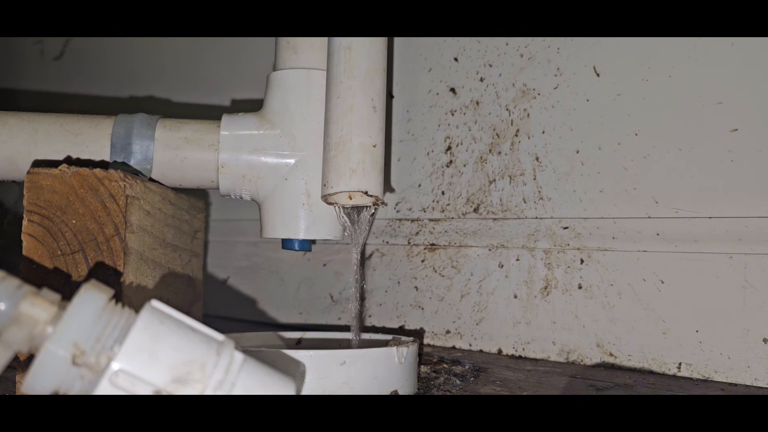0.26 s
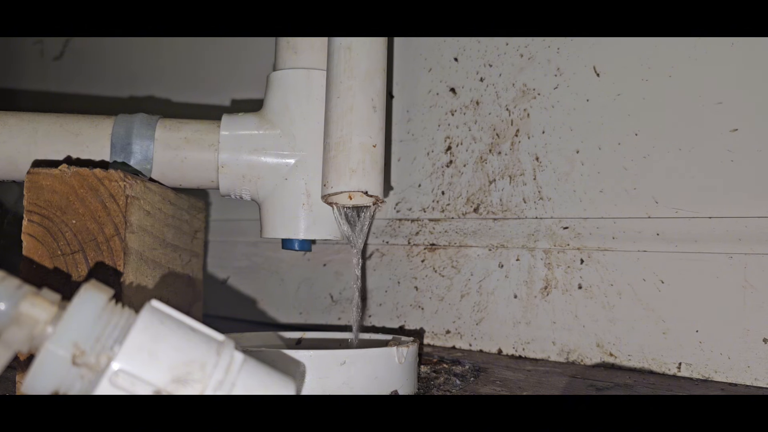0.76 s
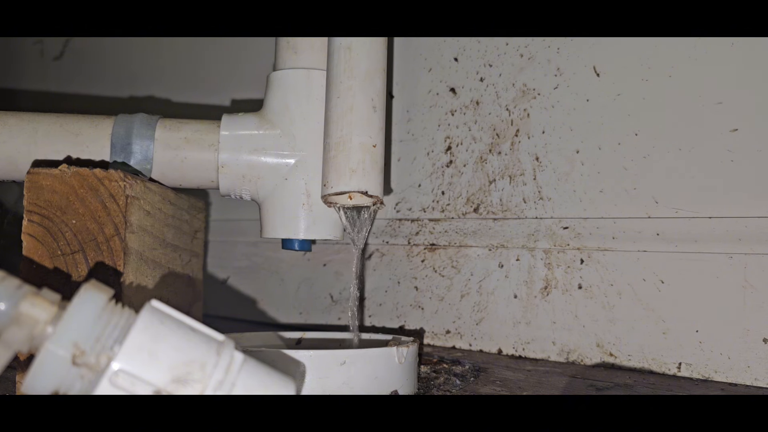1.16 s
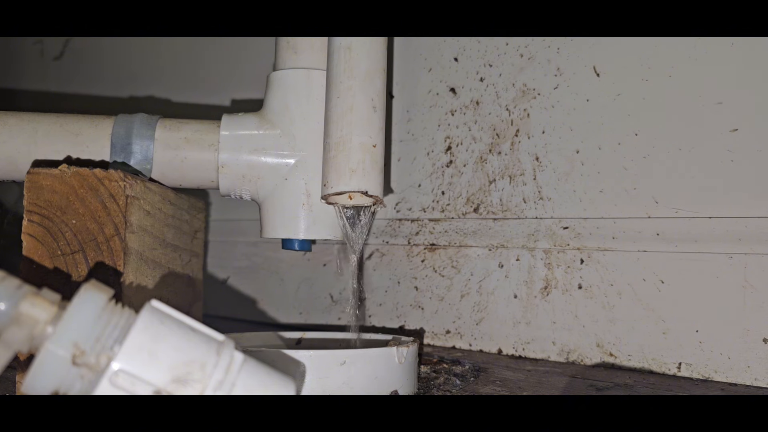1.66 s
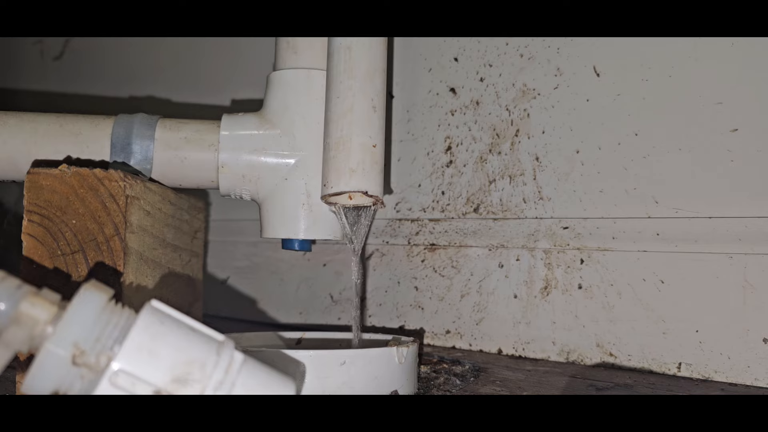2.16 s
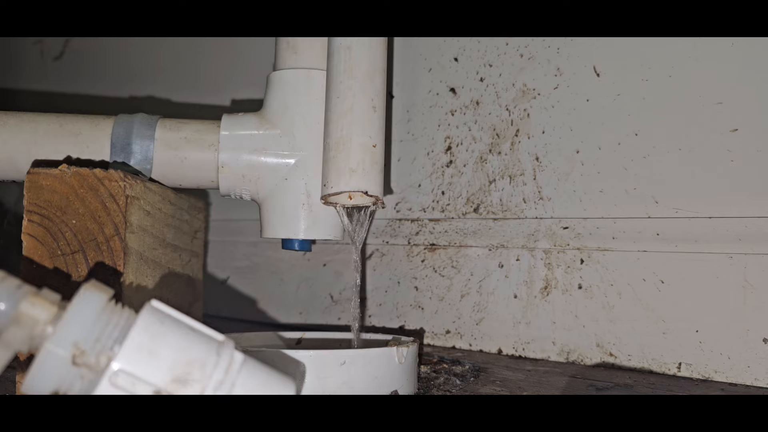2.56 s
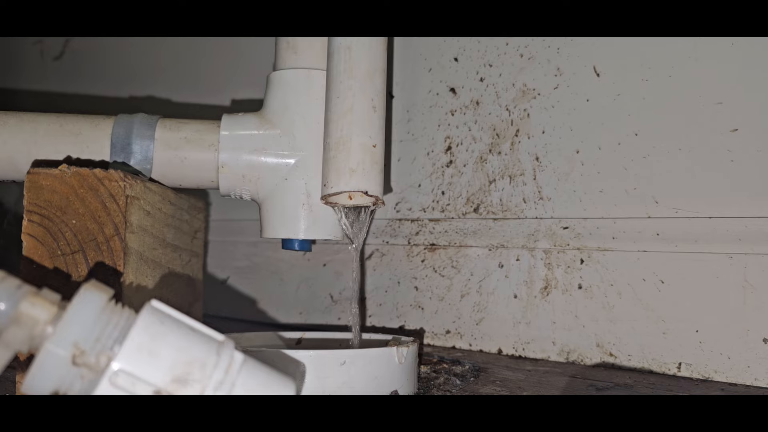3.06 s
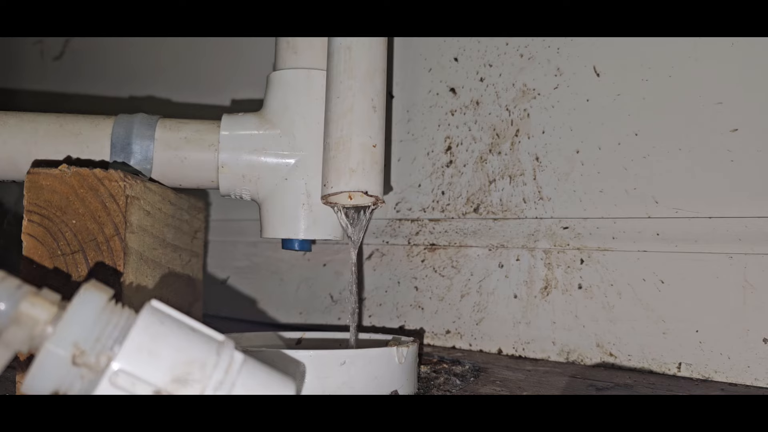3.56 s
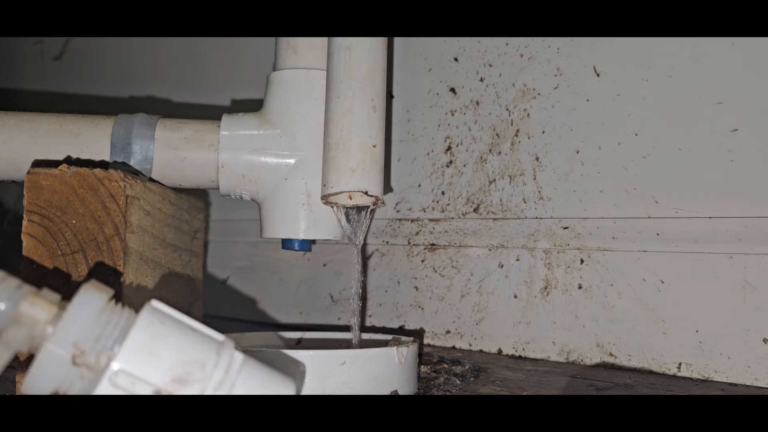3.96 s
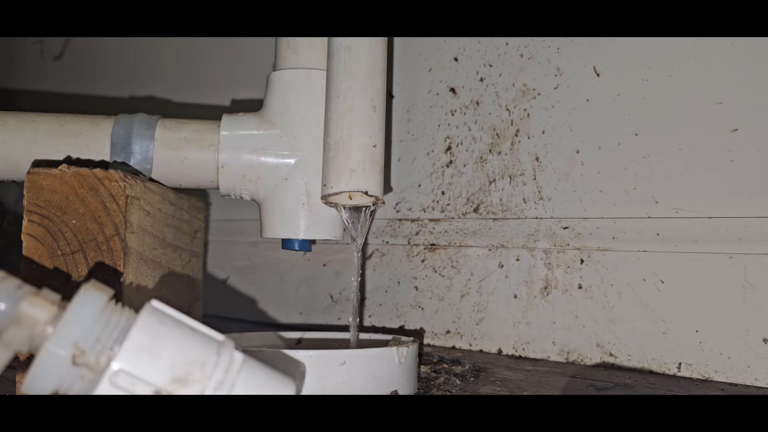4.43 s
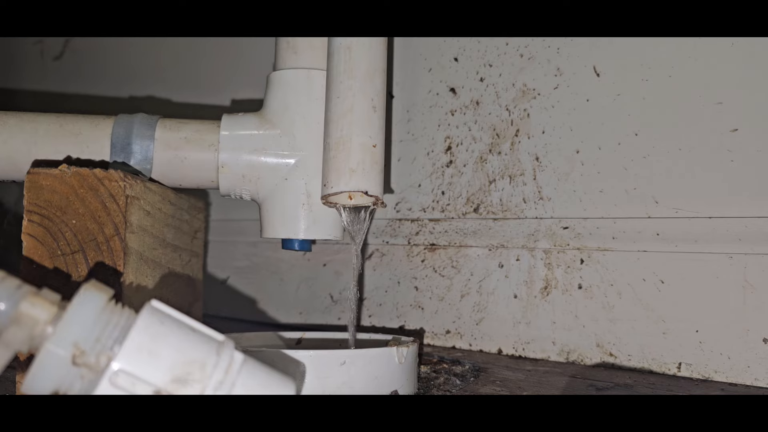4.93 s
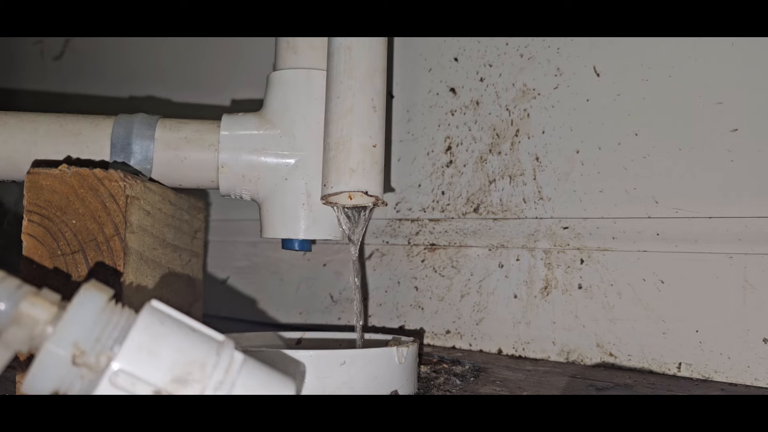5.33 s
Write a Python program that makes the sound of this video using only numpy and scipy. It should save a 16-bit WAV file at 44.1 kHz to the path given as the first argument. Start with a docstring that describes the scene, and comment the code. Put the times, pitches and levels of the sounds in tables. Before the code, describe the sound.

A thin stream patters and gurgles softly into an open standpipe while motors hum very low. Soft brushing comes first, then a sudden deep bump and rattling knocks as someone shifts about close to the phone, mostly left of centre. Smaller cracks and rustles continue, thinning toward the end while the water keeps running. The room adds only short reflections.

```python
"""A machine hums and water trickles from a plastic pipe into a standpipe in a small utility room.
Coloured droplet noise makes the trickle, ringing clicks the single drops, and steady tones the hum.
Then, to the left of a two-port phone microphone, someone shifts about: uneven noise grains make cloth
and shoes rustle, struck resonances make things knock, and slower decaying sines make them thud.
Spray ticks and air hiss are filtered noise; knocks and drops also excite short room reflections."""
import sys
import numpy as np
from scipy import signal
from scipy.fft import rfft, irfft, next_fast_len
from scipy.io import wavfile
from scipy.ndimage import uniform_filter1d

SR = 44100
rng = np.random.default_rng(int(sys.argv[2]) if len(sys.argv) > 2 else 0)


def dump_mix(stems):
    """Bounce the given channels to the path in sys.argv[1] as a 16-bit WAV at rate SR."""
    frames = np.atleast_2d(stems).T  # one column per channel
    limited = np.clip(frames, -1, 1)  # hard clip at full scale
    pcm = np.round(limited * 32767).astype(np.int16)
    wavfile.write(sys.argv[1], SR, pcm)


N = 246519  # length in samples

# Colour of the standpipe: (frequency [Hz], relative level [dB per Hz])
DRAIN_COLOUR = [(44, -36), (75, 1), (87, -13), (124, -5), (182, -24), (199, -8), (252, -4), (299, -14.5),
                (358, -13.5), (458, -15), (501, -10), (627, -24.5), (1100, -33), (1430, -62.5),
                (2420, -120)]
# Resonances of the faintly ticking standpipe rim: (frequency [Hz], width [Hz], level [dB])
RIM_MODES = [(815, 380, -6), (1160, 370, -2.5), (1337, 424, 0.5), (2193, 120, -21.5), (2900, 220, -18),
             (3700, 330, -28), (4240, 300, -20)]
# Single drops that stand out: (time [s], dull peak [dB], bright part relative to dull [dB])
DROPS = [(0.182, -46, -11), (0.251, -43, 6), (0.28, -43, -25), (0.434, -48, -6), (0.544, -46, -24),
         (0.571, -48, -10), (1.439, -44, -8), (1.536, -43, -14), (1.745, -41.5, -21), (1.808, -43, -10),
         (1.867, -46, -19), (2.903, -46, -14), (3.035, -47, -19)]
# Dull ring of a drop: (frequency [Hz], width [Hz], level [dB])
PLOP_MODES = [(257, 110, 0), (521, 177.5, 0)]
# Bright ring of a drop: (frequency [Hz], width [Hz], level [dB])
PLINK_MODES = [(1406, 167, 9), (2300, 416, 3), (3500, 1070, -8)]
# Knocks: (time [s], hollow peak [dB], crack relative [dB], fizz relative [dB],
#          hollow spot [Hz], crack spot [Hz], left minus right [dB])
KNOCKS = [(1.157, -41, -9, -11, 477, 1240, 2.5), (2.124, -29.5, -3, -9, 484, 2210, 6),
          (2.446, -22.5, -10, -18, 421, 1600, 4), (2.622, -30, -21, -24, 395, 1390, 8.5),
          (2.636, -31, -15, -23.5, 407, 1250, 15), (2.709, -44, -2, -25.5, 466, 1320, 8),
          (3.088, -22, 0, -4, 673, 1560, 7.5), (3.101, -23.5, -2, -18, 492, 1330, 2.5),
          (3.115, -25.5, -11.5, -18, 400, 1540, 1), (3.178, -30.5, -8, -38.5, 538, 1720, 4),
          (3.258, -27, -14, -20.5, 650, 1570, 0), (3.289, -33.5, -16.5, -7, 392, 1750, 11),
          (3.36, -42.5, -8.5, -6, 870, 3509, 3.5), (3.503, -34, 3.5, -12.5, 890, 1430, 4),
          (3.689, -39.5, -2.5, -12, 937, 2110, 2.5), (3.733, -29, -5, -5, 895, 1490, 2),
          (3.903, -44.5, -6.5, -23.5, 443, 1200, 2), (4.02, -30, 2.5, -6.5, 870, 1334, 4.5),
          (4.036, -33, 5, -5.5, 870, 1840, 3.5), (4.172, -38.5, 2, -14.5, 760, 1960, 2.5),
          (4.193, -35.5, 12, -9.5, 724, 2020, 1), (4.221, -38, -7, -18, 826, 1310, 6),
          (4.313, -40.5, -6, -9, 430, 1510, 6.5), (4.413, -25, 5.5, -0.5, 530, 1710, 5),
          (4.429, -46.5, 1.5, 2.5, 484, 1460, 5.5), (4.556, -36.5, -1.5, -4, 818, 1250, 0.5),
          (4.783, -37, 0.5, -7, 785, 4200, 5.5), (4.798, -34.5, -5, -8.5, 830, 1210, 4),
          (4.878, -33.5, -4.5, -12.5, 500, 1390, 3), (4.953, -48, 9, -30.5, 425, 2090, -1.5),
          (5.144, -52, 19, -27.5, 390, 2050, 1)]
# Hollow body of the knocked things: (frequency [Hz], width [Hz], level [dB])
HOLLOW_MODES = [(346, 46.5, -4), (428.7, 35.3, 4), (461.5, 60, 0), (579.3, 38.6, 1), (635, 30, -2.5),
                (708.6, 60.3, 2.5), (774.4, 29.7, 2.5), (850.6, 76.1, 2), (949, 12.5, -1.5),
                (1117, 140, -12.5)]
# Higher, cracking resonances of the knocked things: (frequency [Hz], width [Hz], level [dB])
CRACK_MODES = [(1417, 269, -0.12), (1589, 28.3, 3.5), (1712, 173, -5), (2196, 163, 1.45), (2585, 125, -3.5),
               (2913, 124, 3.35), (3215, 144, 3), (3485, 121, 2.5), (3776, 276, -4), (4192, 147, -5),
               (4342, 865, -5), (5326, 110, -2)]
# Thuds: (time [s], panel level [dB], floor relative [dB], struck pitch region [Hz],
#         contact time [ms], damping factor [times])
THUDS = [(1.159, -45, -3, 235, 2.3, 1.77), (2.446, -14.5, -4, 133.9, 2.72, 1.66),
         (2.457, -11, -30, 172.4, 4.02, 1.665), (2.62, -28, -8, 182.2, 1.87, 1.77),
         (2.639, -32, -11, 166.9, 1.48, 2.3), (2.699, -42, 6.5, 169, 4.97, 1.67),
         (3.093, -25.5, -3.5, 136.1, 1.24, 0.69), (3.109, -25.5, -5.5, 141, 1.64, 1.31),
         (3.172, -42, 11, 131.5, 4.4, 1.53), (3.21, -46.5, 13.5, 129, 5.3, 1.5),
         (3.265, -39, 9, 299, 5.9, 1.67), (3.301, -40, -2.5, 218, 3.4, 1.74),
         (3.716, -47, 10, 238, 7.5, 1.33), (4.023, -44.5, 6, 214, 2.9, 1.2),
         (4.314, -42.5, 4, 133, 4.9, 0.96), (4.413, -27, -4.5, 232, 2.23, 1.77),
         (4.429, -37.5, 3, 238, 2.75, 1.5), (4.862, -42, -5, 244, 3.3, 0.69),
         (5.28, -34.5, -28.5, 215, 5.76, 1.56)]
# Panels: (frequency [Hz], decay to -60 dB at damping factor 1 [s], level [dB])
PANEL_MODES = [(158.7, 0.3627, 3.5), (187.63, 0.3451, -2), (209.44, 0.46, -1.5), (227.3, 0.0051, 8.5),
               (240.8, 0.0135, -2.5), (290.2, 0.14, 0)]
# The deeper floor: (frequency [Hz], decay to -60 dB at damping factor 1 [s], level [dB])
FLOOR_MODES = [(80.08, 0.596, -4), (91.37, 0.305, 6.5), (111.36, 0.312, -3.5)]
# Rustles: (time at full strength [s], rise over 20 dB [s], hold [s], fall over 20 dB [s],
#           hiss [dB], scrape relative [dB], drag relative [dB]); very short slopes are lengthened
RUSTLES = [(1.26, 0.15, 0.081, 0.4, -70.5, 1.5, 1), (1.57, 0.1286, 0.0125, .06, -46, -5, -17),
           (1.687, 0.16, 0.042, 0.66, -71.5, 2.5, 3.5), (1.978, .016, 0.047, 0.0411, -46.5, -4.5, -15.5),
           (2.1, 0.0557, .015, .08, -59, 4.5, 1.5), (2.318, 0.3447, 0.048, 0.02, -70.5, 2.5, 6.5),
           (2.432, .015, 0.072, .07, -55, 0.5, 5), (2.697, 0.2062, 0.0883, 0.1962, -60.5, 1, 6.5),
           (2.97, -0.16, 0.113, -0.1, -55.5, -6.5, -12.5), (3.288, 0.1428, 0.004, 0.2144, -52.5, 0, 11.5),
           (3.359, 0.018, 0.0065, 0.1764, -57, -2, 4.5), (3.446, -0.13, 0.0453, 0.1955, -54, -5, -7.5),
           (3.718, 0.0644, 0.0424, 0.06, -45, -1, -0.5), (3.844, 0.77, 0.166, 0.99, -64.5, 2, 3),
           (4.182, 0.03, 0.0334, -0.0269, -57, 3.5, 5.5), (4.274, .025, .012, .085, -53, -5, -9),
           (4.582, 0.1918, 0.008, 0.1092, -47, 0.5, -2.5), (4.663, 0.3043, 0.0071, 0.11, -52, 1, 6),
           (4.819, 0.2043, 0.0083, 0.085, -57, 3.5, 4), (4.875, 0.0027, 0.0039, 0.1046, -55, 3, 6),
           (5.021, .02, 0.019, 0.21, -69, -7, 3), (5.113, -1.67, 0.0087, 1.27, -76.5, -10.5, 4.5),
           (5.356, .1, .015, .07, -57, -4, 3)]
# Colour of the cloth hiss: (frequency [Hz], relative level [dB per Hz])
CLOTH_COLOUR = [(2650, -32.5), (4500, -10), (6740, -4), (7650, 0), (10300, -15.5), (11500, 1),
                (14200, -4.5), (16000, -3)]
# Fine spray ticks: (time [s], level [dB], pitch [Hz])
SPRAY_TICKS = [(0.332, -48, 11270), (0.4559, -49, 11300), (0.617, -54.5, 10800), (0.7003, -60, 12000),
               (0.808, -47, 13300), (0.845, -51.5, 15300), (0.884, -53, 13760), (1.768, -47.5, 11550)]
# Colour of the room air: (frequency [Hz], relative level [dB per Hz])
AIR_COLOUR = [(2000, -6), (2250, -3.5), (2600, -9.5), (4200, -8.5), (5500, -16), (7300, -9), (9500, -32.5),
              (11400, -14.5), (12500, -21.5), (15500, -15)]
# Two motors that beat against each other, and the mains: (frequency [Hz], RMS level [dB])
HUM_TONES = [(53.6, -45), (58.9, -57), (120.05, -62)]

FLOW_DB = -55  # middle level of the trickle before the pipe colours it
AIR_DB, RUMBLE_DB = -74, -58
SCUFF_DB = -3.5  # deep scuffing, relative to the drag
RATTLE_MS, RISE_MS = 18.25, 0.8955  # rattle decay to -20 dB, time constant of its onset
SNAP_DB = 7.5  # broad snap, relative to the fizz
ROOM_T60_S, ROOM_DB = 0.118, -10.934  # decay to -60 dB, energy of the reflections
LEAD_S, DRAIN_LEAD_S, LOW_LEAD_S = 0.00048, 0.00019, 0.000205  # head start of the left port
TOP_HZ = 15900


def drain(per_s=900, spread_db=4.5, gush=0.547):
    """Droplets of very unequal size patter over a smooth gush and ring the pipe; some drops stand out."""
    falls = rng.random(N) < per_s / SR
    size = undb(spread_db * np.minimum(rng.exponential(size=N), 4))
    patter = unit(falls * size * rng.choice([-1., 1.], N))
    flow = (patter + gush * pair(0.533)) * undb(FLOW_DB + 2.28 * walk(12))
    pipe = colour(flow, DRAIN_COLOUR, DRAIN_LEAD_S) * undb(1.0)
    rim = 0
    for hz, width, db in RIM_MODES:
        once = ring(flow, [(hz, width, 0)])
        rim = rim + ring(once, [(hz, width, db)])  # ringing twice narrows each resonance
    pipe += late(rim, DRAIN_LEAD_S)

    dull, bright = np.zeros(N), np.zeros(N)
    for s, db, bright_db in DROPS:
        dull[int(s * SR)] = undb(db)
        bright[int(s * SR)] = undb(db + bright_db)
    click = 1. * (np.arange(SR // 10) == 0)
    drops = np.zeros(N)
    for hits, modes in ((dull, PLOP_MODES), (bright, PLINK_MODES)):
        drops += signal.fftconvolve(hits, peak(ring(click, modes)))[:N]
    return pipe, late(np.array([drops, drops]), DRAIN_LEAD_S)


def knocks(bounces_per_s=4000, hollow_reach=0.268, crack_reach=0.497, settle_db=-16, lean_db=1.2):
    """A sharp blow and a dying rattle of bounces ring the hollow body, crack and fizz (reach in octaves)."""
    hollow_out, sharp_out = np.zeros((2, 2, N + SR))
    ms = np.arange(SR // 4) / SR * 1000
    fade_db, swell = -20 * ms / RATTLE_MS, 1 - np.exp(-ms / RISE_MS)
    # A slower settling follows the rattle
    envelope = swell * (undb(fade_db) + undb(settle_db + fade_db / 4.65))
    for s, db, crack_db, fizz_db, hollow_hz, crack_hz, pan_db in KNOCKS:
        chance = rng.standard_normal(size=(5, len(ms)))
        hits = rng.random(len(ms)) < bounces_per_s / SR
        bounce = hits * (chance[0] + 0.77 * chance[1:3])  # partly unlike at the two ports
        force = bounce * envelope
        force[:, int(RISE_MS * SR / 1000)] += 3.5  # the blow itself
        hollow = peak(ring(force, near(HOLLOW_MODES, hollow_hz, hollow_reach)))
        crack = ring(force, near(CRACK_MODES, crack_hz, crack_reach))
        crack = peak(band(crack, 0.55 * crack_hz, 2.8 * crack_hz))
        fizz = peak(band(chance[3:] * swell * undb(fade_db / 2.464), 2300, 11500, order=1))
        fizz += undb(SNAP_DB) * peak(band(force, 1060, 4780))
        sharp = undb(crack_db) * crack + undb(fizz_db) * fizz
        gain = undb(db + np.array([[pan_db], [-pan_db]]) / 2)
        at = slice(int(s * SR), int(s * SR) + len(ms))
        hollow_out[:, at] += gain * hollow
        sharp_out[:, at] += gain * undb([[-lean_db], [lean_db]]) * sharp  # leans right of the hollow ring
    return late(hollow_out[:, :N], LOW_LEAD_S) + late(sharp_out[:, :N], LEAD_S)


def thuds(reach=0.0868):
    """A soft push rings the floor and the panels whose pitch lies near the struck spot (reach in octaves)."""
    out, t = np.zeros(N + SR), np.arange(SR // 2) / SR
    for s, db, floor_db, spot_hz, contact_ms, damp in THUDS:
        floor = [(hz, t60, g + floor_db - 3.5) for hz, t60, g in FLOOR_MODES]
        note = np.zeros(len(t))
        for hz, t60, g in near(PANEL_MODES, spot_hz, reach) + floor:
            note += undb(g - 60 * damp * t / t60) * np.sin(2 * np.pi * hz * t)
        onset = 1 - np.exp(-t * 1000 / max(contact_ms, .5))
        start = int(s * SR)
        out[start:start + len(t)] += undb(db) * note * onset
    return late(out[:N] * undb([[1.2], [-1.2]]), LOW_LEAD_S)


def rustle():
    """Fibres slip in a dense uneven stream: moves swell, hold and fade as hiss, scrape and dull drag."""
    t, powers = np.arange(N) / SR, 0
    for s, rise_s, hold_s, fall_s, db, scrape_db, drag_db in RUSTLES:
        before = np.maximum((s - t) / max(rise_s, .015), 0)
        after = np.maximum((t - s - hold_s) / max(fall_s, .04), 0)
        level = undb(db - 20 * (before + after))
        powers = powers + (level * undb([[0], [scrape_db], [drag_db]])) ** 2
    grain = undb(1.82 * walk(60) + 1.006 * walk(300))
    hiss = unit(colour(pair(0.049), CLOTH_COLOUR))
    scrape = flutter(pair(0.176), CRACK_MODES, 3.22, 40)
    scrape = unit(scrape + 0.25 * band(pair(0.118), 1300, 5500))
    drag = unit(flutter(pair(0.319), HOLLOW_MODES, 4.0, 25))
    drag += undb(SCUFF_DB) * unit(band(pair(0.845), 52.8, 349))
    hiss_amp, scrape_amp, drag_amp = grain * np.sqrt(powers)
    sides = undb([[-.8], [.8]])  # the hiss leans right, the drag left
    return hiss_amp * sides * hiss + scrape_amp * late(scrape, LEAD_S) + drag_amp * drag / sides


def spray():
    """Tiny decaying puffs of narrow high noise for the spray, over the faint hiss of the room air."""
    air = colour(pair(0.081), [(1200, -41)] + list(AIR_COLOUR))
    out = undb(AIR_DB + 1.5 * walk(25)) * air
    t = np.arange(1200) / SR
    for s, db, hz in SPRAY_TICKS:
        puff = rng.standard_normal((2, len(t))) * np.exp(-t / 0.005)
        start = int(s * SR)
        out[:, start:start + len(t)] += undb(db) * band(puff, 0.963 * hz, min(1.05 * hz, .45 * SR))
    return out


def hum():
    """Steady motor and mains tones over a low noise rumble, nearly alike at both ports."""
    t, tones = np.arange(N) / SR, np.zeros(N)
    for hz, db in HUM_TONES:
        tones += np.sqrt(2) * undb(db) * np.cos(2 * np.pi * hz * t)
    rumble = undb(RUMBLE_DB) * unit(band(rng.standard_normal(N), 34.8, 65.0, order=3))
    return (tones + rumble) * undb([[.5], [-.5]])


def room(x):
    """Dense short reflections, band-limited and different at each port, decay exponentially."""
    t = np.arange(int(.4 * SR)) / SR
    echo = rng.standard_normal((2, len(t))) * np.exp(-np.log(1000) * t / ROOM_T60_S) * (t > .003)
    echo = band(echo, 390, 7800, order=1)
    echo *= undb(ROOM_DB) / np.sqrt(np.sum(echo ** 2, axis=1, keepdims=True))
    return x + signal.fftconvolve(x.mean(axis=0)[None], echo, axes=1)[:, :N]


def near(modes, spot_hz, reach):
    """Modes close in pitch to the struck spot are favoured; reach is in octaves."""
    return [(hz, width, db - (np.log2(hz / spot_hz) / reach) ** 2) for hz, width, db in modes]


def flutter(x, modes, depth_db, rate):
    """Resonances that each swell and fade on their own as the contact wanders."""
    return sum(undb(depth_db * walk(rate)) * ring(x, [mode]) for mode in modes)


def ring(x, modes):
    """Sum of resonances with alternating sign."""
    out = 0
    for k, (hz, width, db) in enumerate(modes):
        out = out + (-1) ** k * undb(db) * signal.lfilter(*signal.iirpeak(hz, hz / width, SR), x)
    return out


def colour(x, points, lead_s=0.):
    """Causal filter through (Hz, dB) points, unit mean power gain; the second port hears it lead_s later."""
    size = next_fast_len(N + SR)
    hz = np.fft.rfftfreq(size, 1 / SR)
    f, db = np.transpose(points)
    log_gain = np.interp(np.log(hz + 1), np.log(f), db) * np.log(10) / 20
    # Folding the cepstrum forward makes the filter minimum-phase
    cepstrum = irfft(log_gain, size)
    cepstrum[1:size // 2] *= 2
    cepstrum[size // 2 + 1:] = 0
    gain = np.exp(rfft(cepstrum))
    gain /= np.sqrt(np.mean(abs(gain) ** 2))
    lag = np.exp(-2j * np.pi * hz * lead_s * np.array([[0], [1]]))
    return irfft(rfft(x, size) * gain * lag, size)[:, :N]


def band(x, lo_hz, hi_hz, order=2):
    """Butterworth band-pass."""
    return signal.sosfilt(signal.butter(order, [lo_hz, hi_hz], "band", fs=SR, output="sos"), x)


def walk(rate):
    """Random levels held 1 / rate s and slewed; spread near 1."""
    k = int(SR / rate)
    steps = np.repeat(rng.standard_normal(N // k + 1), k)
    return 1.076 * uniform_filter1d(steps, k)[:N]


def pair(shared):
    """Noise at both ports, a share of its power common to the two."""
    common, own = rng.standard_normal(N), rng.standard_normal((2, N))
    shared = np.clip(shared, 0, 1)
    return np.sqrt(shared) * common + np.sqrt(1 - shared) * own


def late(x, lead_s):
    """The right port hears a source on the left a little later."""
    return np.array([x[0], np.roll(x[1], int(round(lead_s * SR)))])


def undb(db):
    """Decibels to amplitude."""
    return 10 ** (np.asarray(db) / 20)


def unit(x):
    """Scale to an RMS of 1."""
    return x / np.sqrt(np.mean(x ** 2))


def peak(x):
    """Scale to a peak of 1."""
    return x / abs(x).max()


def scene():
    """Mix all sources; the reflections follow only the knocks and single drops."""
    pipe, drops = drain()
    return pipe + room(knocks() + drops) + thuds() + rustle() + spray() + hum()


def record(dry):
    """The phone cuts the top with a steep low-pass."""
    return signal.sosfilt(signal.ellip(10, .2, 80, TOP_HZ, fs=SR, output="sos"), dry)


dry = scene()
out = record(dry)
dump_mix(out)
```